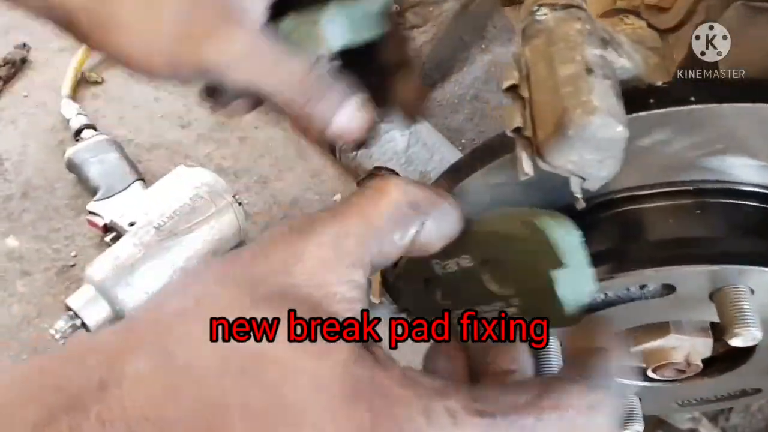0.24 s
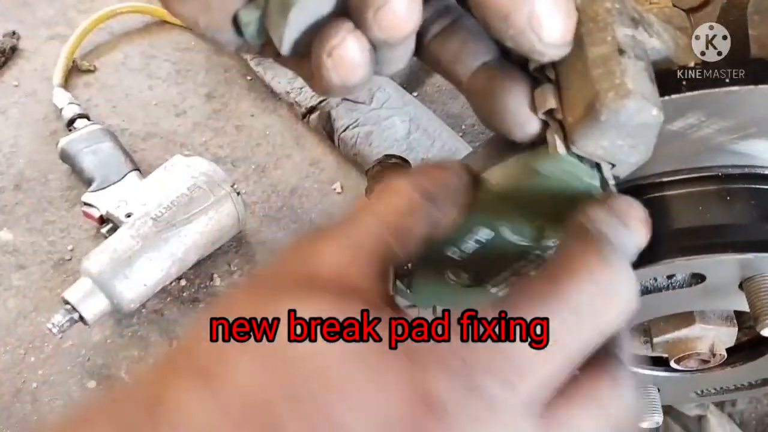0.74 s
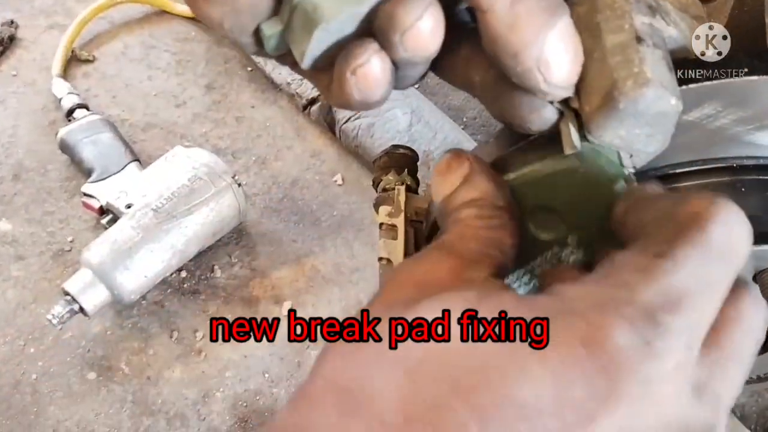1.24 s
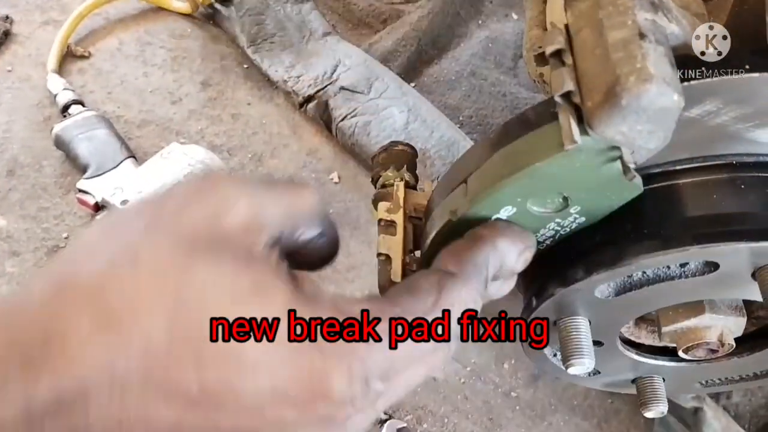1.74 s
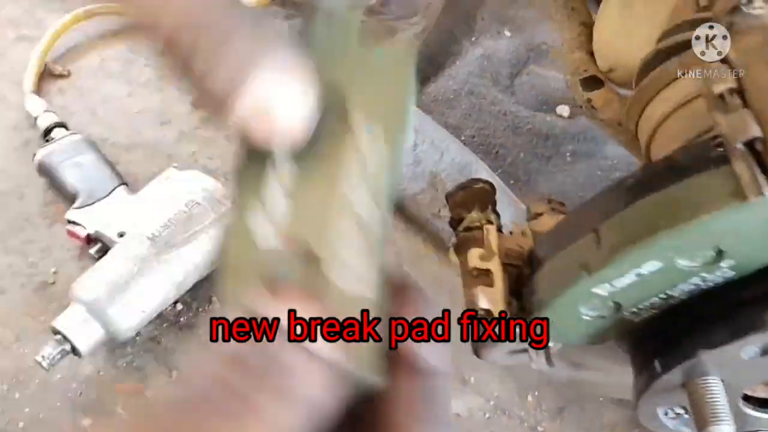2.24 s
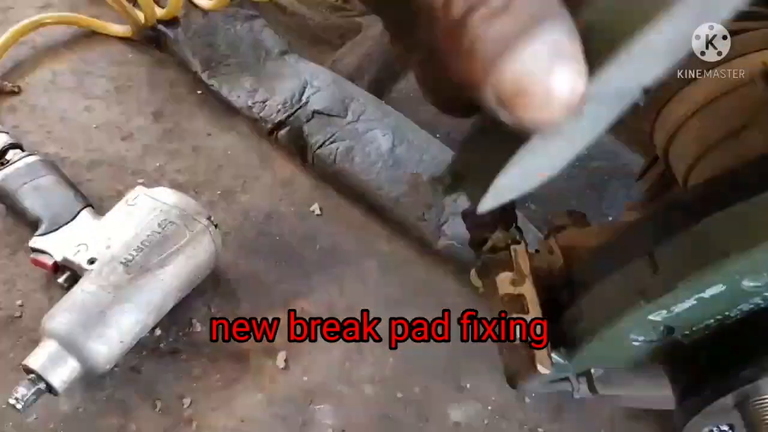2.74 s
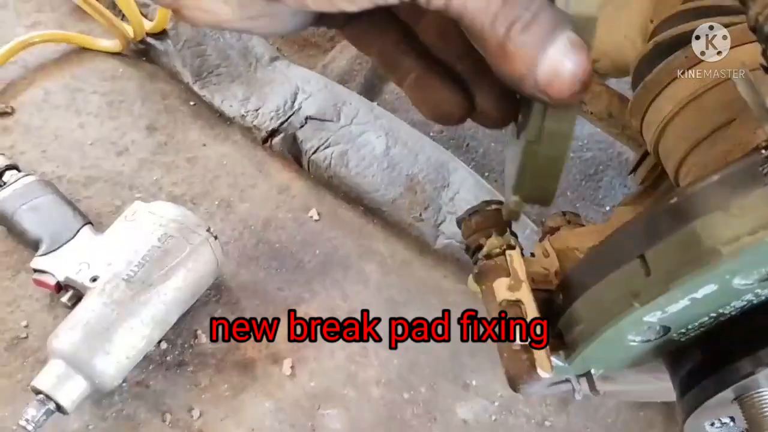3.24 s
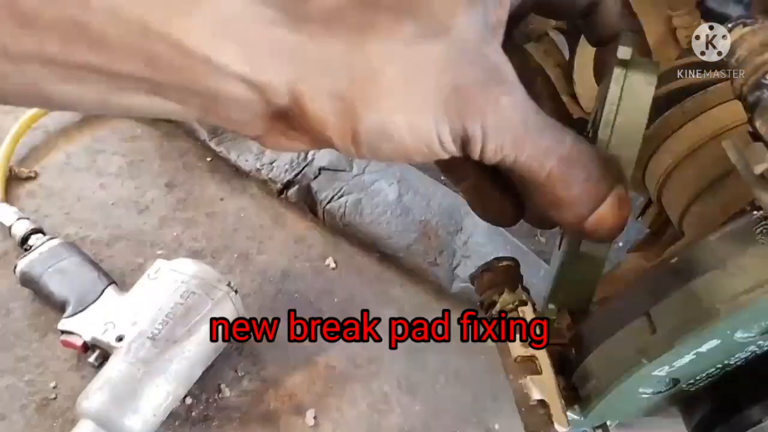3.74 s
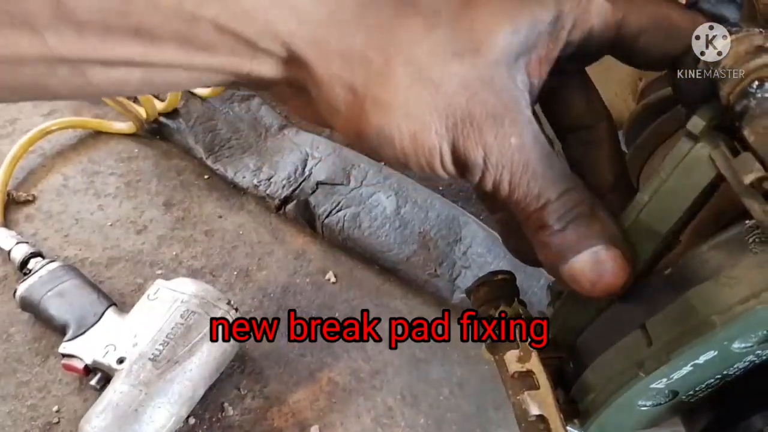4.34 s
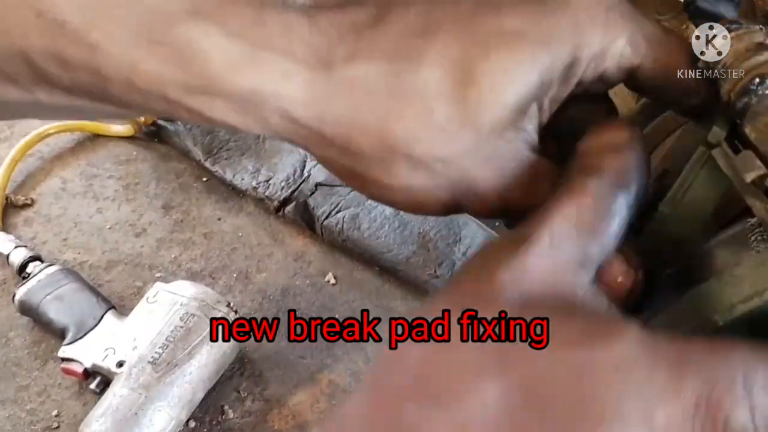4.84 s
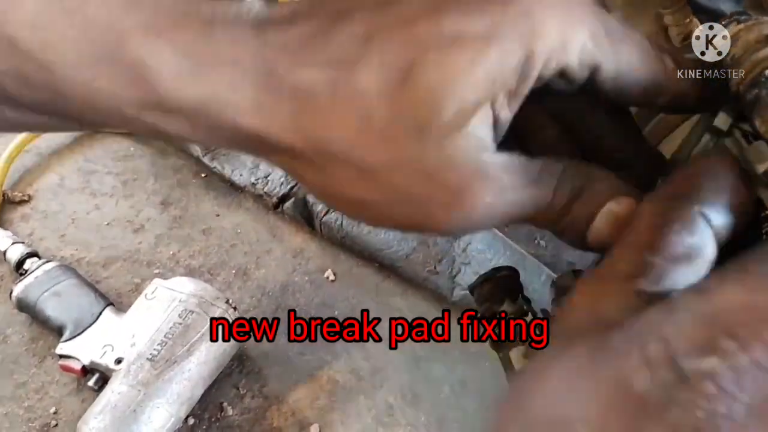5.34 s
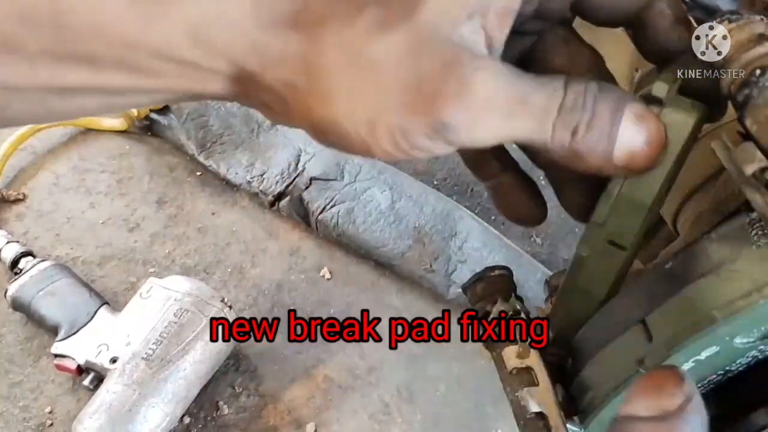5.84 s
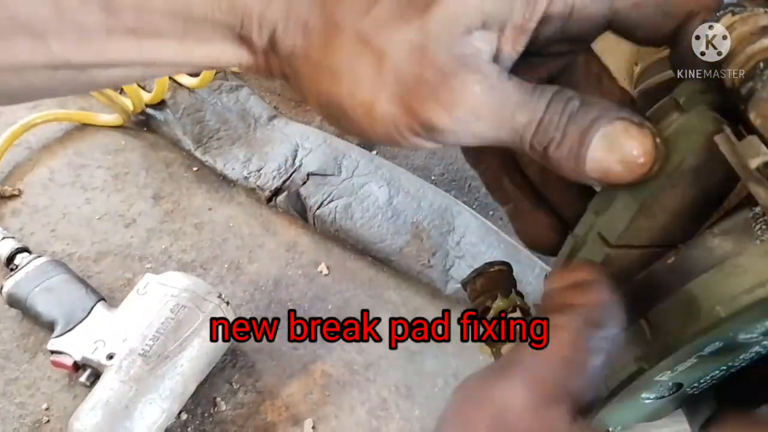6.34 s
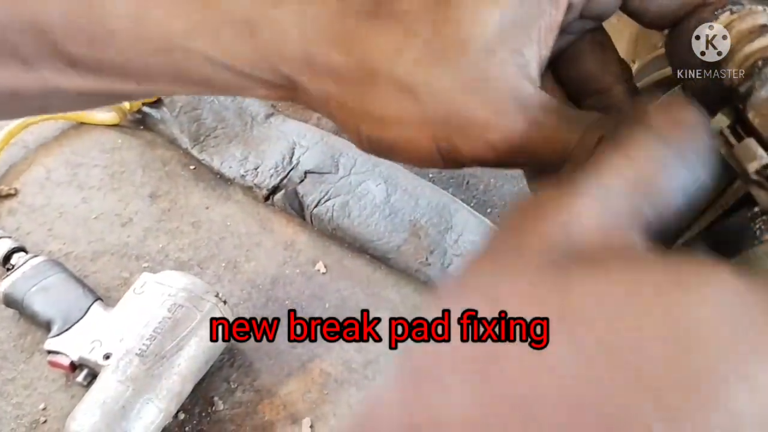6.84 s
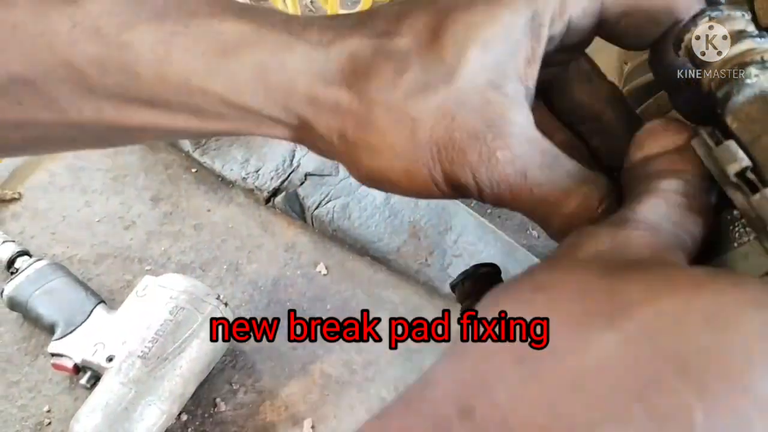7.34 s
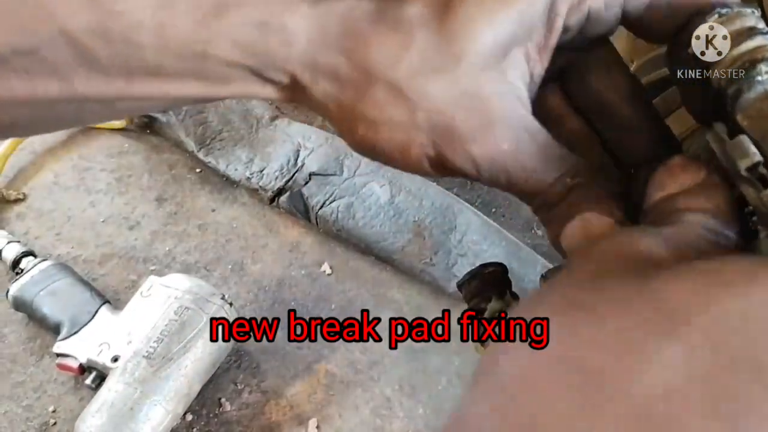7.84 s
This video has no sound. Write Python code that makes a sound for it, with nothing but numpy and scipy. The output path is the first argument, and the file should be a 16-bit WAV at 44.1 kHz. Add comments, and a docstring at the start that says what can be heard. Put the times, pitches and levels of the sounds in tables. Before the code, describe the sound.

A bright, fluttering air leak dominates a workshop, with small metallic knocks, dull rubs and two brief low groans near the end over a soft drone.

```python
"""First comes a hiss, compressed air leaking from an impact wrench's hose in a workshop, over a low rumble.
The hiss is shaped noise, heard close on two microphones, the right one reached first. Hands shade it, and
passing resonances colour it. Brake pads pushed into a caliper bracket knock as struck modes with a short
room tail, and rub as dull noise. Near the end two short low groans are buzzes of quick slips.
The rumble behind is gliding and broad noise, nearly alike at both microphones."""
import sys
import numpy as np
from scipy import signal
from scipy.fft import irfft
from scipy.io import wavfile
from scipy.ndimage import map_coordinates

SR = 44100
rng = np.random.default_rng(int(sys.argv[2]) if len(sys.argv) > 2 else 0)


def int16_out(signal):
    """Quantize to a 16-bit WAV file."""
    q = np.round(np.clip(np.atleast_2d(signal).T, -1, 1) * 32767)
    wavfile.write(sys.argv[1], SR, q.astype(np.int16))


N = 356328
TIME = np.arange(N) / SR
FREQS = np.maximum(np.fft.rfftfreq(N, 1 / SR), 1)
CUTOFF_HZ = 15650
EAR_LAG_S = -0.000276   # arrival at the right microphone after the left; negative: the right is first


# Leak bands as the hands move, before trims and flutter:
# (time [s], open path near 6.5 kHz [dB], sizzle near 9 kHz [dB], top [dB])
LEAK = [(0.02, -44.5, -39.5, -39), (1.72, -39, -41.5, -40.5), (1.9, -36, -50, -46), (2.04, -35, -40, -41.5),
        (2.46, -33.5, -35.5, -39), (2.86, -28.5, -36, -41), (3.72, -36.5, -41, -36),
        (4.22, -34, -40, -39.5), (5.06, -44, -38, -39), (5.7, -33, -39, -39), (6.12, -35.5, -43.5, -43),
        (6.42, -38.5, -38, -45), (6.68, -39, -43.5, -44), (6.88, -45, -39.5, -43.5), (7.36, -45, -42, -44),
        (7.62, -40.5, -39.5, -43), (8.05, -47, -42.5, -43.5)]
# Relative spectrum of the smooth jet at each microphone: (frequency [Hz], density [dB per Hz])
JET_LEFT = [(300, -26), (1000, -15), (1500, -7.5), (1780, 4), (2150, -3), (2500, 2), (3100, 1.5),
            (4000, -1), (5000, -1), (7200, -3.5), (7800, -6), (8400, -18), (10500, -10), (12000, -36),
            (16000, -18)]
JET_RIGHT = [(300, -22.5), (1000, -11.5), (1500, -10), (1780, 2), (2200, 1), (3100, -1.5), (3700, -6.5),
             (4400, -2), (4900, -4), (7300, -7.5), (7800, -15.5), (9000, -36), (10600, -33), (16000, -8)]
# Resonances of the hiss, from low to high; BODY and OPEN_PATH waver around these values:
# (frequency [Hz], width [Hz], relative level [dB], left-right difference [dB])
BODY = [(790, 110, -12, -2), (1230, 140, -7, 3), (1420, 140, -5.5, -2), (2130, 190, -1, 4)]
OPEN_PATH = [(5590, 210, -5.5, 14), (5920, 150, -5, 16), (6330, 240, 1.5, 13.8), (6696, 154, 0, 11.3),
             (6960, 100, -4.5, 14.4), (7300, 180, -3.5, 11.8)]
SIZZLE = [(8240, 420, -0.5, -13), (8680, 680, 6.5, -5), (9480, 890, -0.5, -19)]
TOP = [(11440, 1000, 1.7, -1.5), (12860, 550, -1, -8), (14040, 530, 1.5, -5), (15500, 1100, -0.5, 4.5)]


def air_leak(jet_db=-37.0, body_db=-46.5, open_db=-1.0, sizzle_db=0.0, top_db=-1.6,
             flutter_db=1.4, shade_db=0.74, exposure=0.1):
    """Turbulent jet noise and its resonances, whose bands rise and fall as the hands cover or open the path."""
    open_path, sizzle, top = in_time(LEAK)
    opening = open_path - open_path.mean()
    jet_spectrum = np.array([colour(JET_LEFT), colour(JET_RIGHT)])
    smooth = noise(jet_spectrum, alike(FREQS), EAR_LAG_S)
    # exposure: dB of jet per dB of opening
    hiss = from_db(jet_db + exposure * opening + shade_db * drift(rate=10)) * smooth
    layers = [(body_db, wavering_noise(BODY, waver_db=2.4)),
              (open_path + open_db, wavering_noise(OPEN_PATH, waver_db=0.5)),
              (sizzle + sizzle_db, resonant_noise(SIZZLE)),
              (top + top_db, resonant_noise(TOP))]
    for level, ringing in layers:
        flutter = flutter_db * drift(rate=110)
        shading = shade_db * drift(rate=12)
        hiss = hiss + from_db(level + flutter + shading) * ringing
    return dappled(hiss, depth_db=3.8, patch_hz=210, rate=9, hollowness=.22)


def resonant_noise(modes):
    """Jet noise in a set of fixed resonances, whose powers add; rms 1."""
    power = sum((from_db(db) * pan(side) * bell(FREQS - hz, width)) ** 2 for hz, width, db, side in modes)
    return noise(np.sqrt(power), alike(FREQS), EAR_LAG_S)


def wavering_noise(modes, waver_db, wander=.005):
    """Jet noise in resonances that each swell and shift a little at random; rms 1."""
    total = 0
    for hz, width, db, side in modes:
        gain = from_db(db + waver_db * drift(rate=9))
        centre = hz * (1 + wander * drift(rate=4))
        total = total + gain * pan(side) * gliding_noise(centre, width, alike(hz), EAR_LAG_S)
    return rms_one(total)


# Resonances of the gap between hand and bracket, which ring while the path is open:
# (settled frequency [Hz], width [Hz], level re the open path [dB], left-right difference [dB],
#  share of the path's swing [0-1])
GAP = [(3460, 260, -12, 8, 0.82), (3800, 130, -14, 12.5, 0.43), (4180, 76, -14, 8.5, 1),
       (4520, 170, -4, 10.5, 0.22), (5184, 300, -7, 11, 0.76)]
# the gap widens as the first pad goes in, so its resonances slide down and settle
GAP_SHARP, GAP_SETTLE_S, GAP_SLIDE_S = .075, 2.25, 0.24   # GAP_SHARP: fraction sharp before the slide
# the gap is uncovered between these times, and only softer outside them
GAP_FROM_S, GAP_TO_S, GAP_FADE_S, GAP_COVERED_DB = 1.92, 6.15, 0.11, -8.5


def gap(level_db=0.0, waver_db=1.5, wander=.006):
    """The hiss rings in the gap: all its modes slide together, and swell as the path opens."""
    open_path = in_time(LEAK)[0]
    opening = open_path - open_path.mean()
    slide = (1 - np.tanh((TIME - GAP_SETTLE_S) / GAP_SLIDE_S)) / 2
    tuning = 1 + GAP_SHARP * slide
    inside_s = np.minimum(TIME - GAP_FROM_S, GAP_TO_S - TIME)
    covered = np.clip(.5 - inside_s / GAP_FADE_S, 0, 1)
    out = 0
    for hz, width, db, side, follows in GAP:
        level = open_path.mean() + follows * opening + waver_db * drift(rate=9)
        centre = hz * tuning * (1 + wander * drift(rate=5))
        ringing = gliding_noise(centre, width, alike(hz), EAR_LAG_S)
        out = out + from_db(level + db + level_db) * pan(side) * ringing
    return from_db(GAP_COVERED_DB * covered) * out


# Passing resonances, before they waver: most ring in the hiss, those below 700 Hz are overtones of the rumble
# (start [s], end [s], fade [s], pitch at start [Hz], glide [Hz per s], width [Hz],
#  first level [dB], last level [dB], left-right difference [dB])
PASSING = [ (-0.2, 1.6, .4, 3400, -70, 340, -40.5, -39.5, 19.5),
           (0.7, 1.88, 0.22, 3170, -110, 300, -48, -44.5, 12),
           (-0.2, 1.89, .1, 2800, -11, 170, -43, -53, 15.5),
           (-0.2, 1.48, 0.12, 3700, -10, 170, -49, -50, 4),
           (-0.2, 1.75, .4, 4190, -46, 230, -41, -42.5, 12.5),
           (-0.2, 1.95, 0.17, 5150, -125, 230, -47.5, -42, 15),
           (0.79, 1.6, .08, 2127, -12, 169.8, -34.5, -59.5, 5),
           (1.7, 2.55, 0.11, 2140, -31, 170, -40.5, -51, 11.5),
           (1.88, 2.7, 0.092, 3690, -30.5, 160, -43, -44.5, 11.5),
           (2.1, 2.46, 0.11, 1340, 19, 120, -52, -51, -5), (2.65, 5.6, 0.22, 2110, -8, 160, -44.5, -53, 12),
           (3.3, 4.15, 0.14, 2650, 41, 179.7, -45.5, -43, 10),
           (4.59, 5.02, 0.092, 2680, 30, 330, -39.5, -45.5, 8.5),
           (4.38, 4.5, 0.049, 2111, 1, 200, -44, -46, 7.5),
           (4.9, 5.06, 0.061, 2130, 1, 200.5, -41, -43.5, 8.5),
           (2.07, 2.65, 0.094, 400, 10, 85, -51.5, -53, 0), (3.06, 4.1, .12, 530, -9.5, 140, -51.5, -56, 1),
           (5.2, 6.15, .2, 579.6, 20, 200, -57, -55.5, 0), (6.25, 7.02, .12, 399.7, 70, 170, -56, -53, -2),
           (4.5, 6.7, 0.16, 1234, 39.5, 190, -47, -54, 2.5),
           (5.11, 5.27, .06, 3580, 58, 180.2, -43, -50, 7),
           (5.95, 6.4, 0.21, 3380, 111, 170.5, -49, -38.5, 7.5),
           (6.68, 9.1, 0.42, 2170, -40.5, 170.4, -45, -58, 13),
           (6.66, 8.3, .25, 3036, 5, 230, -39.5, -41.5, 9),
           (6.66, 8.5, .3, 3910, -60.5, 190, -43, -50, 8.5),
           (6.7, 8.2, 0.22, 7180, -22.5, 300, -53, -52.5, 14.5),
           (7.13, 7.9, .24, 2676, -60.5, 220, -37, -42, 8.5)]


def passing_resonances(level_db=0.0, waver_db=1.5, wander=0.007):
    """Bands of noise that each fade in, ring and fade out; each glides, and wavers at random."""
    out = np.zeros((2, N))
    for start, end, fade_s, pitch, glide, width, first_db, last_db, side in PASSING:
        first = max(round((start - fade_s / 2) * SR), 0)
        now = slice(first, round((end + fade_s / 2) * SR))
        age, waver = TIME[now] - start, drift(rate=18)[now]
        db = level_db + np.interp(age, [0, end - start], [first_db, last_db]) + waver_db * waver
        fade = np.clip(np.minimum(age, end - start - age) / fade_s + .5, 0, 1)
        hz = (pitch + glide * age) * (1 + wander * waver)
        ringing = gliding_noise(hz, width, alike(pitch), EAR_LAG_S)
        out[:, now] += fade * from_db(db) * pan(side) * ringing
    return out


# Depth of the two dark valleys in the hiss, before it wanders:
# (time [s], lower valley [0-1], upper valley [0-1])
VALLEYS = [(0.02, 0.2, 0), (1.8, 0.5, 0.06), (2.1, 0.4, 0.44), (2.46, 1, 0.81), (2.8, .6, 0.8),
           (3.1, 0.93, 0.55), (3.5, 0.38, 0.6), (4.45, .55, 0.57), (4.7, 0.27, 0.16), (5.3, 0.8, 0.4),
           (5.8, 0.6, 0.75), (6.3, 0.85, 0.5), (6.7, 0.56, .05), (7.4, .3, 0.02), (8.05, 0.3, 0.07)]


def notched(x, low_hz=1750, high_hz=2970, width_hz=390, unrest=0.33, wander=0.031):
    """Two dark valleys of varying depth; depth and centre wander at random: a moving band is subtracted."""
    lowpass = signal.butter(2, width_hz / 2, fs=SR, output="sos")
    for hz, depth in zip((low_hz, high_hz), in_time(VALLEYS)):
        share = np.clip(depth * (1 + unrest * drift(rate=16)), 0, 1)
        centre = hz * (1 + wander * drift(rate=12))
        turn = np.exp(2j * np.pi * np.cumsum(centre) / SR)
        # shift the valley to 0 Hz, keep what lies near it, shift back
        band = signal.sosfiltfilt(lowpass, x * turn.conj())
        x = x - share * 2 * (band * turn).real
    return x


def dappled(x, depth_db, patch_hz, rate, hollowness, size=512):
    """Narrow patches of the spectrum swell and drop out at random, the gaps deeper; mean power gain is 1."""
    hz, s, spectrum = signal.stft(x, SR, nperseg=size)
    where = np.meshgrid(hz / patch_hz, s * rate, indexing="ij")
    fields = rng.standard_normal((2, 200, 200))   # one per microphone
    chance = np.array([map_coordinates(field, where, order=2, mode="mirror") for field in fields])
    gain = from_db(depth_db * (chance - abs(hollowness) * chance ** 2))
    return signal.istft(spectrum * rms_one(gain), SR, nperseg=size)[1][:, :N]


# Touches of pad on bracket, before the room tail:
# (time [s], relative strength [dB], pitch that the contact favours [Hz],
#  loss of the other modes [dB per octave], level of the dry tick [dB])
KNOCKS = [(0.261, -46.5, 800, 4, -60), (0.295, -51, 550, 4, -60), (0.46, -42, 2200, 11, -42),
          (0.73, -57, 600, 5, -61), (0.832, -50, 2200, 0, -44), (0.848, -27, 2050, 30, -36),
          (0.852, -38.5, 900, 11, -50), (1.175, -31, 1465, 44, -26.5), (1.215, -52, 900, 2, -41),
          (1.554, -47, 1420, 10, -52), (6.903, -40, 2100, 9, -32), (6.914, -40, 1900, 9, -34),
          (6.946, -48, 1200, 3, -37), (6.995, -38.5, 1452, 24, -37), (7.924, -46, 1200, 6, -55)]
# Modes of pad and bracket: (frequency [Hz], relative level [dB], t60 [s])
PAD = [(370, 7, 0.039), (567, -1, 0.062), (745, 7.5, 0.036), (900, 1.5, 0.04), (1106, 2.5, 0.042),
       (1457, 4, 0.055), (2010, 6, 0.025), (2270, 7, 0.035), (2460, -3.5, 0.027), (3430, -13, 0.028),
       (3750, -4, .03)]


def knocks(level_db=-1.5, click_db=0.0, scuff_s=0.009, scuff_rise_s=0.0022, scuff_db=-24.0, low_cut_hz=330):
    """Each touch is a soft click and a brief gritty slide into the modes of pad and bracket."""
    size = SR // 8
    age = np.arange(size) / SR
    slide = from_db(scuff_db) * (1 - np.exp(-age / scuff_rise_s)) * np.exp(-age / scuff_s)
    out = np.zeros((2, N + size))
    for s, db, favoured_hz, loss_db, _ in KNOCKS:
        at = round(s * SR)
        for hz, mode_db, t60 in PAD:
            contact = slide * rng.standard_normal((2, size))
            contact[:, 0] += from_db(click_db) * rng.choice([-1, 1])
            tilt_db = -loss_db * abs(np.log2(hz / favoured_hz))
            out[:, at:at + size] += from_db(level_db + db + mode_db + tilt_db) * ring(contact, hz, t60)
    # small parts radiate little bass
    low_cut = signal.butter(2, low_cut_hz, "high", fs=SR, output="sos")
    return signal.sosfilt(low_cut, out[:, :N])


def ticks(decay_s=0.0043, low_hz=1200, high_hz=5400):
    """Metal edges meet with a dry, broad tick of fading noise as each knock starts."""
    envelope = 0
    for s, *_, db in KNOCKS:
        fade = np.exp(-np.clip(TIME - s, 0, 1) / decay_s)
        envelope = envelope + from_db(db) * (TIME >= s) * fade
    band = signal.butter(1, [low_hz, high_hz], "band", fs=SR, output="sos")
    return envelope * rms_one(signal.sosfilt(band, rng.standard_normal((2, N))))


# A pad rubs dully along the bracket: (time [s], length [s], level [dB])
RUBS = [(0.255, 0.072, -51.5), (0.452, 0.042, -56), (0.719, 0.053, -55.5), (0.833, 0.052, -60),
        (3.238, 0.09, -50), (6.9, 0.018, -48), (6.945, 0.012, -47), (6.992, 0.014, -52), (7.12, 0.047, -59),
        (7.26, 0.044, -74), (7.465, 0.096, -54)]


def rubs(attack_s=0.0074, release_s=0.012):
    """Dull friction noise that rises quickly, holds while the pad moves and dies away."""
    envelope = 0
    for s, length, db in RUBS:
        rise = np.clip((TIME - s) / attack_s, 0, 1)
        fall = np.exp(-np.maximum(TIME - s - length, 0) / release_s)
        envelope = envelope + from_db(db) * rise * fall
    # the rub shares the colour of the rumble's upper skirt
    return envelope * noise(colour(RUMBLE_HIGH), likeness=0.96, lag_s=0)


# Groans, before slowing and taper: (time [s], length [s], level [dB], first slip rate [slips per s],
#  first resonance [Hz], glide of the resonance [Hz per s], resonance boost [dB])
GROANS = [(7.73, 0.078, -30.5, 186, 510.6, -1300, 7), (7.843, 0.066, -40.5, 146, 549, 2700, 31)]


def groans(width_hz=150, slope_db=-10.0, grit_db=-8.5, slowing=0.32, taper=1.55):
    """A few quick slips in a row: a gritty buzz with one dull resonance that swells, slows and fades."""
    out = np.zeros((2, N))
    for s, length, db, first_rate, first_hz, glide, resonance_db in GROANS:
        progress = np.clip((TIME - s) / length, 0, 1)
        rate = first_rate * (1 - slowing * progress ** 3) * (1 + 0.0159 * drift(rate=91))
        centre_hz = first_hz + glide * length * progress
        phase = 2 * np.pi * np.cumsum(rate) / SR
        buzz = 0
        for k in range(1, 6):
            offset = k * rate - centre_hz
            gain = from_db(slope_db * np.log2(k) + resonance_db * bell(offset, width_hz))
            # the phase turns through the resonance
            buzz = buzz + gain * np.cos(k * phase - np.arctan(offset / width_hz))
        buzz = buzz / np.std(buzz[(progress > 0) & (progress < 1)])
        grit = from_db(grit_db) * gliding_noise(centre_hz, width_hz=350, likeness=0.71, lag_s=0)
        swell = np.abs(np.sin(np.pi * progress)) ** taper
        out += from_db(db) * swell * (buzz + grit)
    return out


def workshop(x, t60, wet_db):
    """The room around the bracket: a short diffuse tail, different at each microphone."""
    age = np.arange(SR // 2) / SR
    decay = np.exp(-np.log(1000) * age / t60) * (age > .004)
    tail = rng.standard_normal((2, len(age))) * decay
    tail /= np.sqrt(np.sum(tail ** 2, axis=1, keepdims=True))
    return x + from_db(wet_db) * signal.fftconvolve(x, tail, axes=1)[:, :N]


# Course of the rumble before its parts are trimmed: (time [s], level [dB])
RUMBLE = [(0.02, -62), (0.52, -59.5), (0.68, -64), (0.86, -64.5), (0.95, -57.5), (1.1, -59.5), (1.26, -62),
          (1.33, -57), (1.42, -48), (1.5, -45), (1.59, -56), (1.69, -46), (1.94, -43), (2.3, -40.5),
          (2.62, -41), (2.82, -48), (3.15, -40), (3.75, -38.5), (4.25, -43.5), (4.7, -46.5), (5.7, -45.5),
          (6.3, -44.5), (6.94, -43), (7.1, -54), (7.4, -48.5), (7.5, -57), (7.64, -52.5), (7.92, -43.5),
          (8.05, -50.5)]
# Pitch of the rumble before it wanders: (time [s], pitch [Hz])
RUMBLE_PITCH = [(0.02, 161.6), (2.9, 148.7), (3.06, 133.1), (3.3, 158.5), (4.02, 116.8), (5.44, 129.1),
                (6.3, 240), (7.06, 290.6), (7.24, 152.5), (8.05, 161.1)]
# Relative spectra of the rumble's skirts: (frequency [Hz], density [dB per Hz])
RUMBLE_LOW = [(20, -19), (45, -25), (90, 7), (220, 4.5), (330, -11.5), (700, -44)]
RUMBLE_HIGH = [(150, -2.5), (300, 4.5), (500, 3), (650, -5), (800, 0.5), (1100, -7.5), (2000, -54)]


def rumble(hum_db=-2.0, hump_db=-5.5, low_db=-7.0, high_db=-10.0, low_slope_db=-0.5, high_slope_db=-3.0,
           high_follows=0.85, surge_db=1.5, hum_loss_db=5.0, wander=.025):
    """A dull noise drone that sinks and later climbs in pitch, growing broader and thinner in the bass."""
    level, = in_time(RUMBLE)
    hz, = in_time(RUMBLE_PITCH)
    octaves = np.log2(hz / hz.mean())
    # the slopes and the hum's loss are in dB per octave of climb
    hum_hz = hz * (1 + wander * drift(rate=11))
    hum_gain = from_db(hum_db - hum_loss_db * np.maximum(octaves, 0))
    hum = hum_gain * gliding_noise(hum_hz, width_hz=37.4, likeness=0.99, lag_s=0)
    hump = from_db(hump_db) * gliding_noise(1.15 * hz, width_hz=180, likeness=0.97, lag_s=0)
    low_gain = from_db(low_db + low_slope_db * octaves)
    low_skirt = low_gain * noise(colour(RUMBLE_LOW), likeness=0.98, lag_s=0)
    # the upper skirt follows the level less than fully
    high_level = level.max() + high_follows * (level - level.max())
    high_gain = from_db(high_db + high_level + high_slope_db * octaves)
    high_skirt = high_gain * noise(colour(RUMBLE_HIGH), likeness=0.68, lag_s=0)
    surge = from_db(surge_db * drift(rate=12))
    return surge * (from_db(level) * (hum + hump + low_skirt) + high_skirt)


# Part of the hiss that both microphones share: (frequency [Hz], share of power [0-1])
LIKENESS = [(700, 0.33), (1300, 0.63), (1800, 0.55), (2600, 0.45), (4200, 0.42), (8000, 0.21)]


def alike(hz):
    """Part of the hiss that both microphones share at a frequency."""
    return np.interp(hz, *np.transpose(LIKENESS))


def noise(gain, likeness, lag_s):
    """Coloured stereo noise whose shared part reaches one microphone before the other if lagged; rms 1."""
    shared, left, right = rng.standard_normal((3, 2 * len(FREQS))).view(complex)
    share = np.clip(likeness, 0, 1)
    direct = np.array([shared, shared * np.exp(-2j * np.pi * FREQS * lag_s)])
    diffuse = np.array([left, right])
    return rms_one(irfft(gain * (np.sqrt(share) * direct + np.sqrt(1 - share) * diffuse), N))


def gliding_noise(hz, width_hz, likeness, lag_s, size=8):
    """Stereo noise in one resonance whose centre moves: a tone with a random slow amplitude; rms 1."""
    white = rng.standard_normal((3, 2 * len(TIME[::size]))).view(complex)[:, :len(hz[::size])]
    slow_rate = SR / size
    lowpass = signal.butter(2, min(width_hz / 2, slow_rate / 3), fs=slow_rate, output="sos")
    slow = signal.sosfilt(lowpass, white)
    share = np.clip(likeness, 0, 1)
    ears = np.sqrt(share) * slow[0] + np.sqrt(1 - share) * slow[1:]
    ears[1] *= np.exp(-2j * np.pi * hz[::size] * lag_s)
    # back to the full sample rate by straight lines
    amplitude = signal.upfirdn(signal.windows.triang(2 * size - 1), ears, size)[:, :len(hz)]
    tone = np.exp(2j * np.pi * np.cumsum(hz) / SR)
    return rms_one((amplitude * tone).real)


def ring(force, hz, t60):
    """A damped mode: a unit click sets a decaying sine of starting height 1 ringing."""
    r, w = from_db(-60 / (t60 * SR)), 2 * np.pi * hz / SR
    return signal.lfilter([0, np.sin(w)], [1, -2 * r * np.cos(w), r * r], force + 1e-18)


def bell(offset_hz, width_hz):
    """Gain of a resonance with steep skirts."""
    return 1 / (1 + (1.18 * offset_hz / width_hz) ** 2)


def drift(rate):
    """Slow chance of spread 1 that takes a new course rate times a second."""
    points = rng.standard_normal(2048)
    course = np.interp(TIME * np.clip(rate, 1, 200), np.arange(2048), points)
    return course * np.sqrt(3 / 2)   # makes up for the spread lost between points


def colour(points):
    """Gain at every frequency from a short spectrum."""
    hz, db = np.transpose(points)
    return from_db(np.interp(np.log(FREQS), np.log(hz), db))


def in_time(rows):
    """Each column of a curve, sample by sample."""
    s, *columns = np.transpose(rows)
    return [np.interp(TIME, s, c) for c in columns]


def pan(db):
    """Left and right gains for a level difference."""
    return from_db(np.array([[db], [-db]]) / 2)


def from_db(db):
    """Decibels to gain."""
    return 10 ** (np.asarray(db) / 20)


def rms_one(x):
    """Scale to unit power."""
    return x / np.sqrt(np.mean(x ** 2) + 1e-20)


def scene():
    """The hiss and its resonances, the handling in the room, the groans, and the rumble behind."""
    ringing = dappled(gap() + passing_resonances(), depth_db=2.0, patch_hz=170, rate=13, hollowness=.25)
    hiss = notched(air_leak() + ringing)
    contacts = workshop(knocks() + ticks(), t60=0.11, wet_db=-3.0)
    return hiss + contacts + rubs() + groans() + rumble()


def record(dry):
    """The top is cut steeply by an elliptic low-pass."""
    return signal.sosfilt(signal.ellip(12, .1, 80, CUTOFF_HZ, fs=SR, output="sos"), dry)


dry = scene()
out = record(dry)
int16_out(out)
```